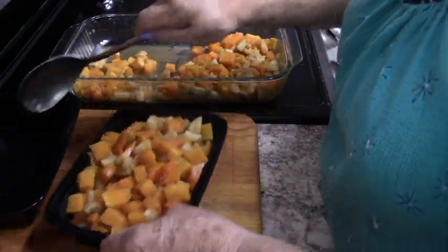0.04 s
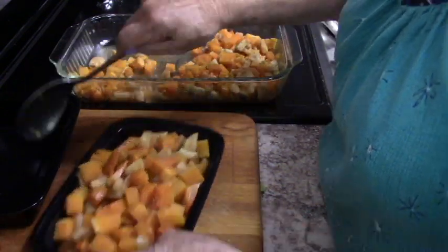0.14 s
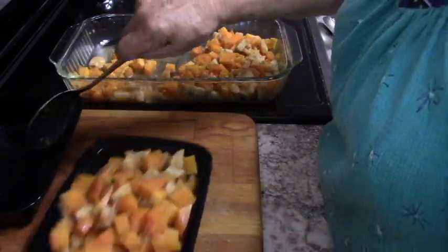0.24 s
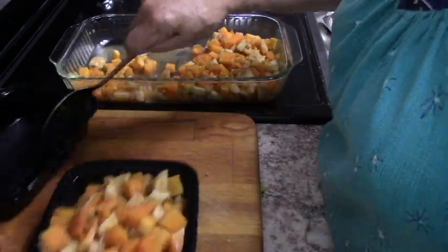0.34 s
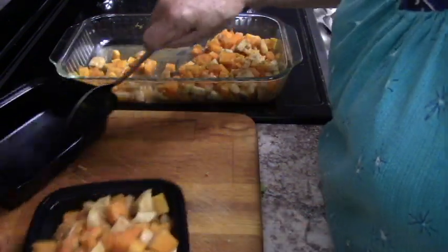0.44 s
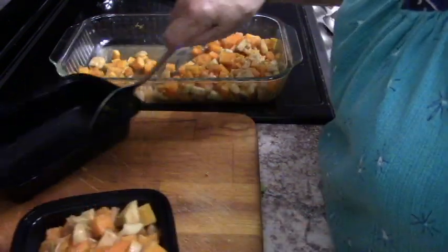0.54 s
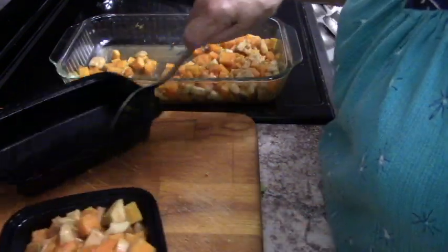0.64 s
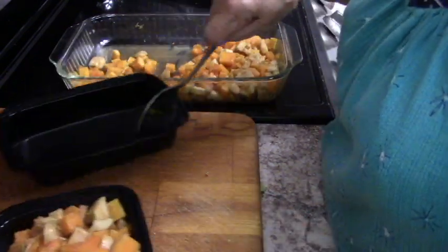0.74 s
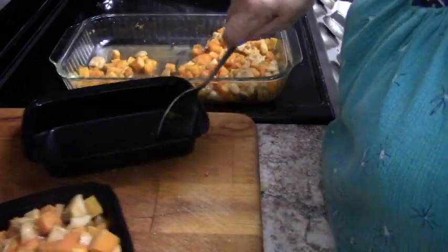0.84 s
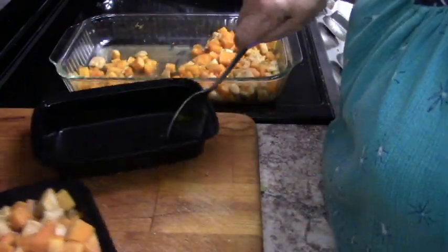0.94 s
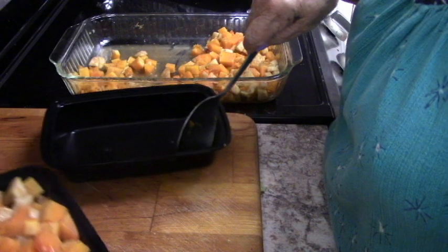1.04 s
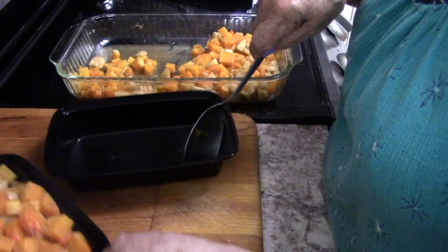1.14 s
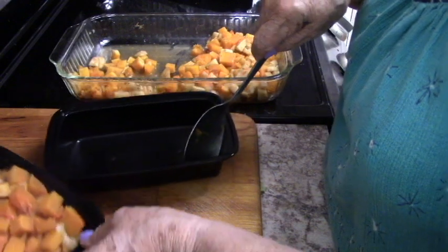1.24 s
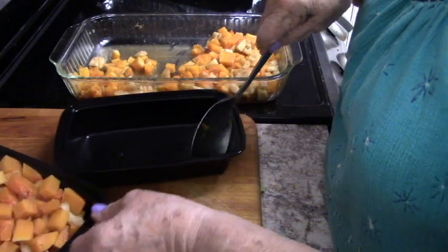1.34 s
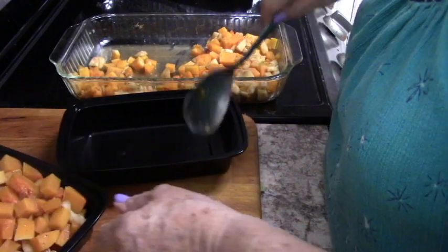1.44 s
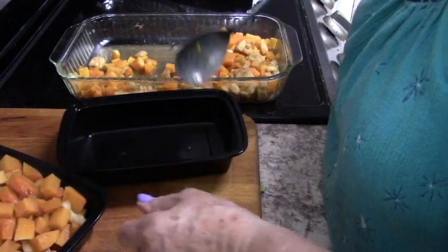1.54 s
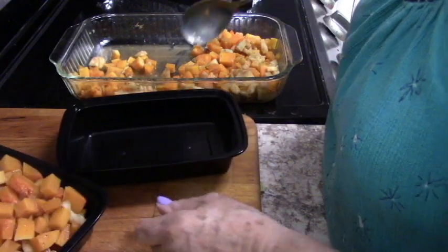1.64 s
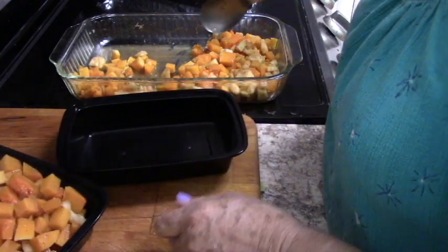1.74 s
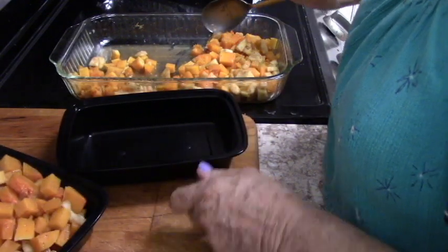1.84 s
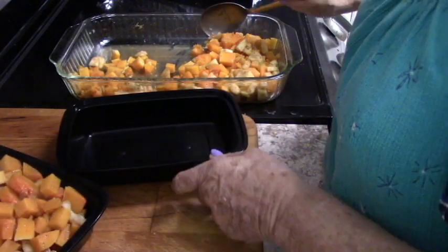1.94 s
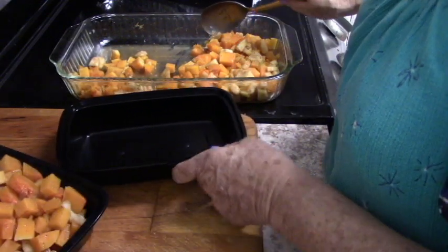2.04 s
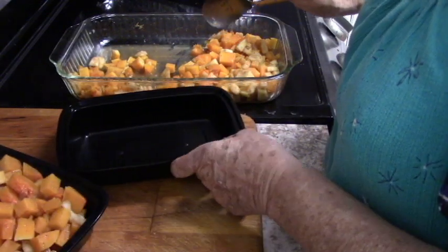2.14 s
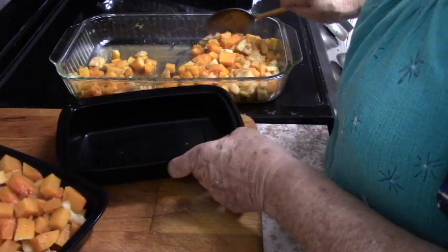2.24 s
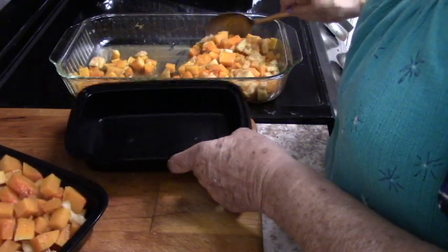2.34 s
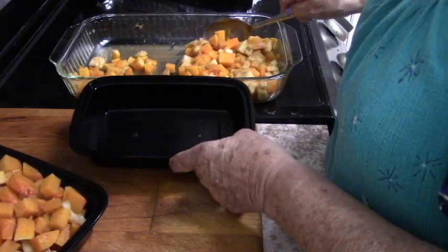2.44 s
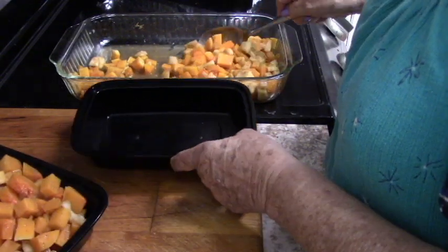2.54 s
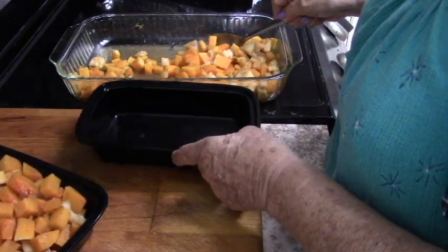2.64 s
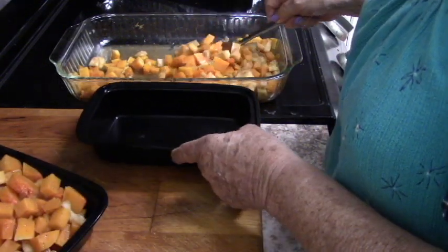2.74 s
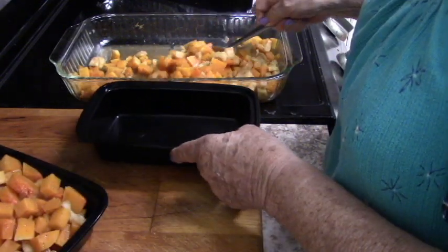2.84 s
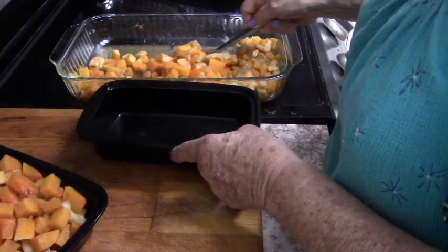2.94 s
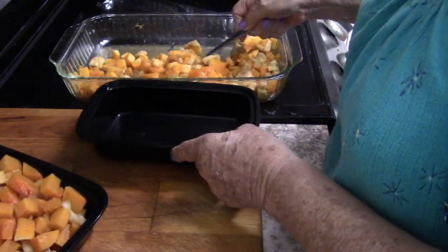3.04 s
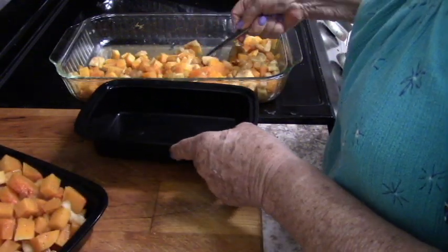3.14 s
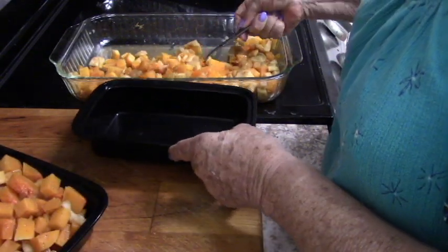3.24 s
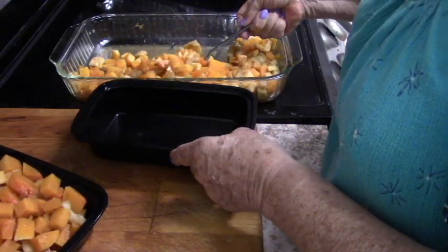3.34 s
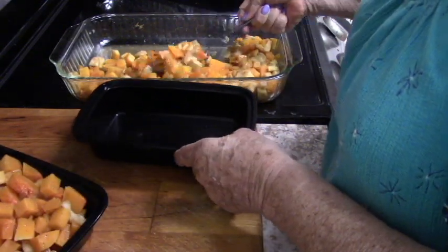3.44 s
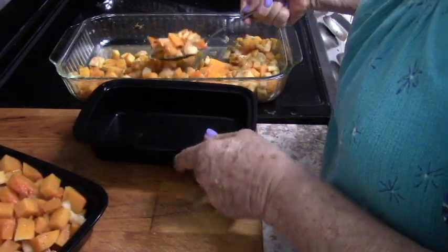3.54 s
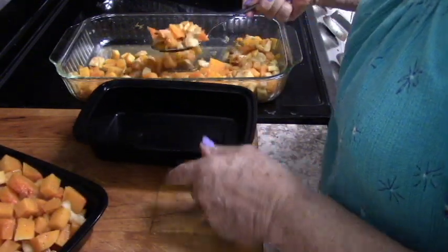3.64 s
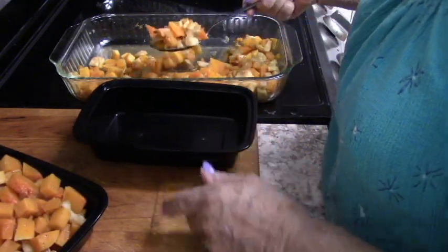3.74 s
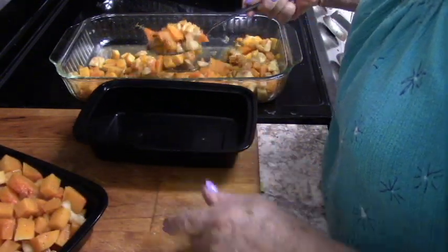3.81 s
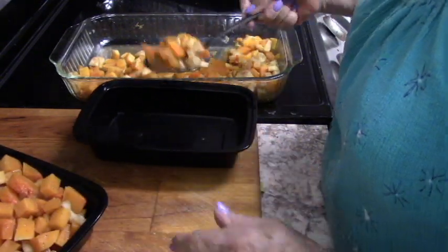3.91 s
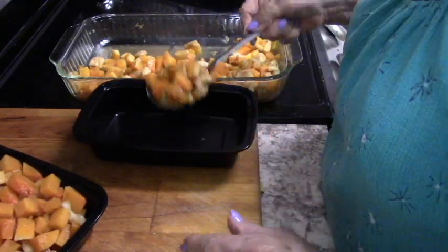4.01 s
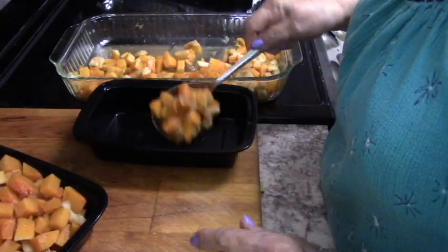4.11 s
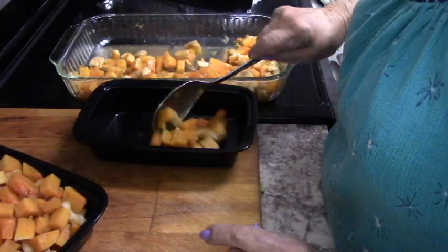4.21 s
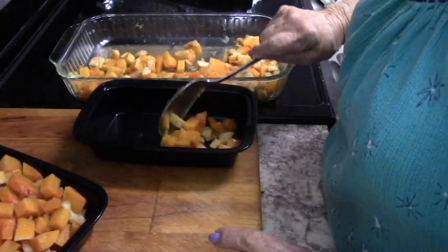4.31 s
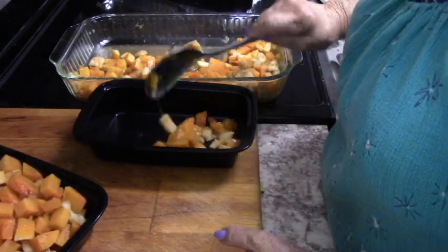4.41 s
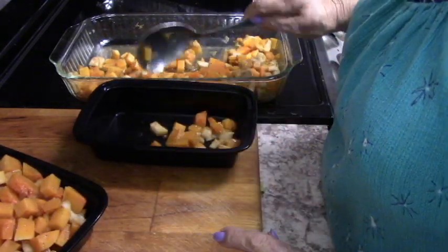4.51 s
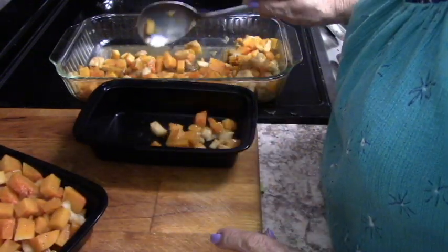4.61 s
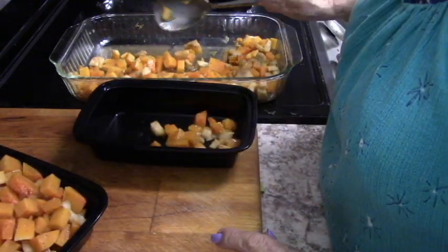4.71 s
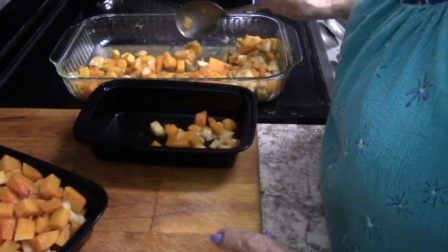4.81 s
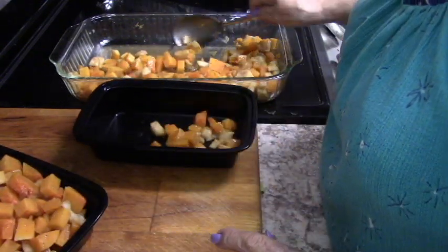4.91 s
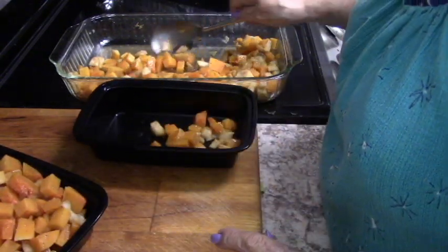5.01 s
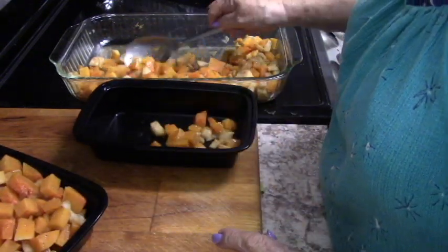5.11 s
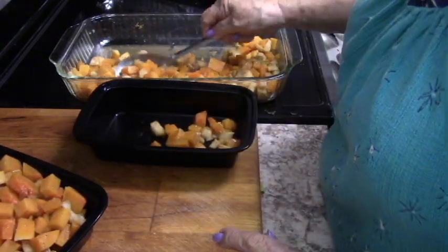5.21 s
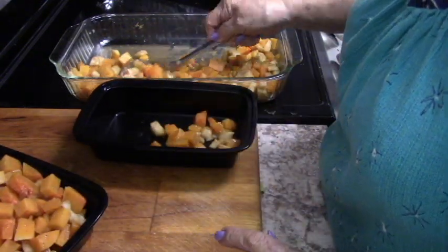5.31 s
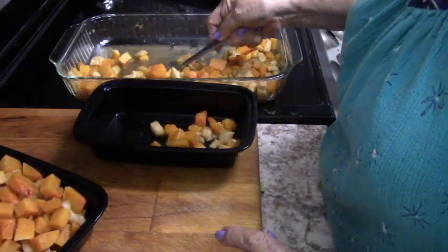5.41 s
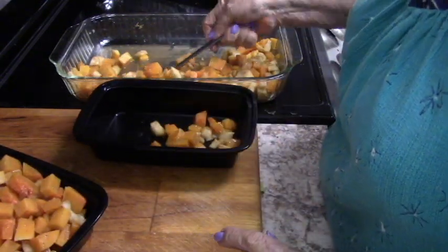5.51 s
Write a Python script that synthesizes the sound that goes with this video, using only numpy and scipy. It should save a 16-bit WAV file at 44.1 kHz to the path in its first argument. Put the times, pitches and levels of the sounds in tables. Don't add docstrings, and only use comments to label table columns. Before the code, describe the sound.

A close, slightly left-leaning stereo view of a small quiet kitchen with soft air hiss and short hard-walled reflections. Faint rubbing begins, then at 0.2-0.3 s a loud cluster of hard plastic knocks. From about 0.36 to 0.65 s an empty tray is pulled over a wooden board with a rough, hollow, slightly squeaky scrape; a longer juddering pull runs from 0.75 to 1.45 s, with a sharp click near 1.19. Near silence follows, with only a faint hand brush. At 2.2 s the spoon touches glass lightly, then taps brightly at 2.29. From 2.45 to 3.7 s it digs through soft cubes with small muffled knocks and tiny wet ticks. Cubes fall into the tray in faint dull pats around 4.2-4.5 s. A strong, quickly damped glass clink with a rebound comes at 4.94, quiet digging from 5.1, and a duller clink at 5.4.

```python
import sys
import numpy as np
from scipy import signal
from scipy.io import wavfile

SR = 44100
rng = np.random.default_rng(int(sys.argv[2]) if len(sys.argv) > 2 else 0)


def unload_audio(sound):
    columns = np.transpose(np.atleast_2d(sound))
    steps = np.round(np.clip(columns, -1, 1) * 32767)
    wavfile.write(sys.argv[1], SR, steps.astype(np.int16))


def invert_db(x):
    u = np.asarray(x, float) / 20
    return 10 ** u


N = 245195

# start_s, load_db, speed_db
DRAG_PULLS = [
    [(0.0, -58, -49.5), (0.212, -58.5, -48), (0.29, -56, -48.5)],
    [(0.36, -52, -45), (0.42, -37.5, -43.5), (0.49, -45, -43), (0.56, -46.5, -48.5), (0.636, -48.5, -44.5),
     (0.67, -46, -48.5)],
    [(0.75, -39.5, -41.5), (0.835, -42, -38.5), (0.93, -47.5, -51), (1.069, -48.5, -46), (1.18, -50, -49),
     (1.25, -53, -49.5), (1.415, -46.5, -48.5), (1.441, -66, -64), (1.47, -80, -81)],
]
# start_s, length_s, load_db, speed_db
SWIPES = [
    (1.755, 0.7, -68, -82),
    (2.059, 0.098, -61.5, -59.5),
    (2.432, 0.49, -61, -72.5),
    (2.847, 0.45, -72.5, -74.5),
    (3.745, 0.33, -68.5, -65),
    (4.04, 0.25, -68.5, -78),
    (4.188, 0.29, -67, -80),
    (5.07, 0.24, -65.5, -64.5),
]
SWIPE_ATTACK, SWIPE_RELEASE, SWIPE_EDGE_DB = 0.28, 0.47, -12.5
RANGE_LOAD_SHARE = [0.89, 0.25, 0.18, 0.022]
RANGE_LEVEL_DB = [0.17, 5.56, 4.26, 0.5]
# pitch_hz, density_db per Hz
RUB_COLOUR = [(47, -60.5), (80, -38.5), (361, -8.5), (404, -12), (515, -7), (751, -6), (1530, -2),
              (4330, -2), (8600, -8.5), (14300, -23.5), (16000, -46)]
# pitch_hz, likeness
RUB_ALIKE = [(60, 0.63), (240, 1), (950, 0.97), (3770, 0.9), (15000, 0.44)]
# pitch_hz, width_hz, level_db
TRAY_RESONANCES = [(495, 27, -6), (1500, 370, 0), (2900, 310, -2), (3680, 40, -7), (5180, 690, -7),
                   (5910, 116.5, -7), (8470, 18, -9)]
# time_s, hollow_hz, hollow_db, edge_hz
TRAY_TILT = [(0, 2124, 5.5, 6040), (.3, 1917, 7.5, 6100), (.5, 1713, 2.5, 9100), (0.648, 2460, -4, 8200),
             (.76, 2300, -2.5, 7600), (.86, 2300, -5.5, 5900), (.96, 1650, 8, 6360),
             (1.12, 1687, 8.5, 6900), (1.451, 2406, 3.5, 6200)]
# start_s, length_s, level_db, pitch_hz, width_hz
SQUEALS = [(0.469, 0.036, -51, 2900, 120), (.51, .11, -47, 9100, 350), (.58, .1, -47, 8700, 350),
           (.65, .15, -46, 8250, 350), (.615, .04, -46, 1050, 80), (5.095, .02, -51, 7800, 150),
           (1.08, .06, -44, 900, 200), (.75, 0.033, -45, 6030, 300), (.29, 0.06, -48, 2620, 300),
           (.42, 0.069, -43, 1880, 200), (.53, .04, -48, 3530, 300), (1.2, 0.096, -46, 2100, 150),
           (1.3, 0.042, -44.5, 875, 120), (2.11, .04, -54, 1400, 300), (2.125, 0.023, -56, 810, 150),
           (0.741, 0.1, -42, 3050, 90), (0.799, 0.05, -40, 5270, 900), (0.958, 0.095, -47, 1920, 120),
           (1.041, 0.059, -41, 1820, 100), (1.06, 0.055, -46, 2740, 70), (1.322, 0.08, -43.5, 3380, 500),
           (1.892, 0.17, -66.5, 2020, 50), (1.93, 0.13, -67.5, 1650, 40), (2.116, .025, -56.5, 3100, 303),
           (2.362, 0.028, -52, 734, 90), (2.395, 0.029, -56.5, 1710, 70), (3.797, 0.25, -67, 7360, 1200)]

# start_s, peak_db, hardness_db, ring_hz
TRAY_KNOCKS = [(0.2276, -13, -2, 900), (0.2339, -4, -3, 1034), (0.2421, -21.5, 12.5, 1640),
               (0.258, -12, -10, 1510), (0.2812, -22, -8, 2400), (0.3742, -20.5, -10, 3530),
               (0.4005, -21, -13, 2350), (0.6684, -32, -20, 2800), (0.6769, -20, -31, 2840),
               (0.7516, -24, 1, 1500), (1.1898, -19, 3, 7800), (1.1915, -18.5, 9.5, 3920),
               (.5377, -27, -5, 1390), (.408, -28, -8, 1500)]
# start_s, peak_db, hardness_db, ring_hz, length_share
DIGS = [(2.4839, -40, -3.5, 2710, 0.5), (2.5485, -44.5, -2, 1310, 0.62), (2.582, -48, -16, 3180, 0.74),
        (2.6476, -53, -9, 930, 0.78), (2.6838, -40, 0, 837, 1), (2.7268, -26, -0.5, 1070, 0.29),
        (2.7545, -35, -9, 1170, 0.35), (2.847, -50, -5, 2930, 0.31), (2.9375, -42, -19, 1990, .5),
        (2.9415, -41, -18, 3020, .4), (3.032, -48, -18, 670, 0.6), (3.153, -61.5, 6, 360, 1),
        (3.189, -52, -2, 856, .9), (3.4524, -45.5, -3.5, 842, .9), (3.711, -55.5, 9, 5160, .9)]
# start_s, peak_db, hardness_db, ring_hz, length_share
CUBE_DROPS = [(4.0301, -58, -8, 503, 1.7), (4.2075, -49, -13.5, 775, 1.26), (4.2164, -51, -8, 1500, .9),
              (4.234, -48, 15, 860, .9), (4.2935, -47, -9, 1440, 1), (4.2995, -52.5, -11, 604, 0.78),
              (4.3075, -50, -10, 1450, 1.3), (4.3241, -58, -2, 980, 1.1), (4.336, -55.5, -9, 700, 1.4),
              (4.3538, -53.5, -8, 495, 1.1), (4.363, -58, -7, 523, 1.1), (4.4022, -62, -17, 410, 1.4),
              (4.4835, -51, -5.5, 1500, .8), (4.4985, -54, -15, 840, 0.75), (4.5196, -48.5, -4, 820, 1.1),
              (5.1134, -53, -4, 946, 1)]
# start_s, peak_db, hardness_db, ring_hz
SECOND_DIGS = [
    (5.0984, -42.5, 6.5, 7400),
    (5.2275, -43, -14, 2140),
    (5.2588, -42, -22, 2720),
    (5.3724, -56.5, -10, 2960),
]
# start_s, peak_db, hardness_db, ring_hz
BOUNCES = [
    (0.32, -49, -2, 1820),
    (.263, -30, -9, 1500),
    (.270, -27, -21, 900),
    (2.733, -40, -10, 1500),
    (2.945, -42.5, -5, 1580),
    (4.312, -55.5, -7.5, 1120),
    (4.505, -61, -1, 1424),
]
# lows_db, lows_per_hardness, lows_db per octave of ring, highs_db,
# highs_per_hardness, t60_s, pure_ring, lowest_hz, thud_db
HARD_TRAY = (-10, -0.14, 0.5, -0.5, 1.0, 0.0249, 0.38, 368, -27)
WET_FOOD = (-10, 0.5, -3, -4, 1.0, 0.06, 0.35, 380, -24)
SOFT_CUBE = (-1, -1.0, 0.0, -20, -.1, .021, .2, 330, -9)
REBOUND = (-4.5, -0.5, 0.5, 6, 1, 0.04, 0.6, 383, -19)
# start_s, peak_db, centre_hz
SMACKS = [(0.24, -14, 8600), (.257, -18, 8850), (1.1905, -17, 7900), (1.592, -57, 11000),
          (1.607, -51.5, 5170), (2.792, -48, 12600), (3.082, -57, 8800), (3.155, -41.5, 9070),
          (3.365, -61, 10760), (3.466, -47, 10700), (3.603, -52.5, 6340), (3.709, -60, 11930),
          (4.031, -53, 11100), (4.264, -39.5, 10240), (4.337, -52, 10000), (4.352, -53, 8050),
          (4.522, -45.5, 9400), (5.098, -37, 11100), (5.124, -57, 11000), (5.14, -43, 9900),
          (5.184, -47, 10200), (5.209, -50, 12170), (5.229, -49, 10700), (5.096, -44, 13500),
          (5.278, -53, 11000), (4.523, -50, 5140), (4.484, -53, 2900), (2.728, -31.5, 3220),
          (2.7284, -37, 4670), (5.372, -51, 3800), (.4008, -24, 2380), (5.26, -41.5, 4500),
          (5.275, -50, 7940)]

# start_s, peak_db, crack_db under the peak, damping_share, contact_cut_hz
CLINKS = [
    (2.2038, -28, -13, 0.56, 4500),
    (2.2855, -7.5, -13.5, 0.48, 13200),
    (4.9351, -6, -8, 1, 5900),
    (5.4044, -12.5, -13.5, 0.62, 6460),
    (2.321, -28.5, -14, 0.53, 8000),
    (4.9418, -12.5, -9, 0.31, 12000),
]
# glass_db, steel_db, bass_lift_db, top_slope_db per octave, crowd_db,
# crowd_length_share, tick_db, wash_db
CLINK_DRIVE = [
    (-3, -12.5, 16, -8.5, -28.5, 0.99, -22.5, -22.5),
    (-23.5, -6.5, 6, 0.5, -28, .8, -3.5, -22),
    (-7, -6.5, 1.5, -1.5, -21, 0.96, -6, -20),
    (-12, -17.5, -16, -5, -33, 0.63, -15, -16),
    (-13, -6, 3.5, -6, -29.5, .6, -13, -25.5),
    (-14.5, -5, -1, -1, -33, .6, -11.5, -28),
]
# pitch_hz, level_db
STRUCK_PLACE = [
    [(700, 20.5), (870, -6), (505, 2), (1885, 8), (2665, 8.5), (3045, 8.5), (3582, -3), (2285, 9),
     (2505, 12), (4570, 8), (1174, 0.5)],
    [(505, 12.5), (3758, -2.5), (2665, 1.5), (4098, 4), (1174, 3), (700, -20), (1885, 14.5), (7220, 5),
     (8050, -11.5), (11170, 4), (5371, 1), (5190, -5.5), (5588, -8), (3582, -0.5), (8875, 2), (6330, 3)],
    [(505, -15), (5371, 4), (5232, 2), (9850, 5), (12100, 4.5), (10300, -5.5), (6330, -17), (7220, -2),
     (7700, 9), (3758, -1), (4098, 3), (2113, 2), (1637, 2), (8875, -27), (4907, 5.5), (9580, -4),
     (8050, 7), (2285, 5), (12400, -0.5)],
    [(505, 19.5), (1495, 5), (3045, 15), (3582, 6), (4098, 6), (1885, -5), (700, 6), (8050, 11), (2505, 8),
     (12400, -13), (6330, 2), (870, -12)],
    [(5300, 7), (3582, 2)],
    [(3758, 5.5), (5232, 8)],
]
CROWD_BEAT_HZ = [260, 200, 330, 480, 260, 260]
MODE_HZ = [505, 700, 870, 1174, 1495, 1637, 1885, 2113, 2285, 2405, 2505, 2665, 3045, 3582, 3758, 4098,
           4570, 4907, 5232, 5371, 5588, 6330, 6725, 7220, 7700, 8050, 8875, 9580, 9850, 10300, 11170,
           12100, 12400, 13600]
MODE_T60 = [0.17, 0.098, 0.036, 0.1, 0.062, 0.091, 0.28, 0.049, 0.084, 0.024, 0.075, 0.15, 0.045, 0.05,
            0.13, 0.057, 0.095, 0.07, 0.074, 0.065, 0.043, .07, 0.08, 0.072, 0.055, 0.045, 0.022, .06, .05,
            .05, 0.03, .04, 0.034, .05]
MODE_DB = [-18, -31, -10, -17.5, -11.5, -8, -16.5, -10, -12.5, -1, -12.5, -12.5, -4.5, -0.5, -3.5, -10, -14,
           -8, -6, -4, -12.5, -9, -24.5, -5, -14.5, -13.5, 0.5, -13.5, -12, -8.5, -4, -8.5, -4.5, -11]
STEEL_HZ = [2665, 3582, 3758, 5232, 5371, 5588, 6330, 7220, 8875, 9580, 10300, 11170, 13600]
# start_s, peak_db, pitch_hz, t60_s
DISH_FLEX = [
    (2.203, -28, 720, .04),
    (2.212, -36, 590, 0.1),
    (2.324, -47, 343, 0.11),
    (4.939, -43, 310, 0.095),
    (5.115, -38.5, 505, 0.087),
    (5.233, -50, 495, 0.085),
    (5.407, -49.5, 330, 0.12),
]

# pitch_hz, t60_s
ROOM_T60 = [(200, 0.48), (1000, 0.36), (4000, 0.33), (8000, 0.29), (13000, 0.3)]
# start_s, peak_db, pitch_hz, t60_s
BOOMS = [
    (.86, -60, 135, .15),
    (.73, -60, 115, .15),
    (1, -54, 185, 0.14),
    (.44, -54, 260, .08),
    (4.935, -57, 150, 0.17),
    (4.3, -56, 260, .15),
    (5.4, -47, 350, 0.11),
    (2.5, -63, 240, 0.29),
    (2.33, -60, 210, .1),
]
# pitch_hz, density_db per Hz
HUSH_COLOUR = [(25, -16.5), (60, -7), (125, -6), (250, -5), (500, 2), (1000, 0.5), (1600, -0.5), (2100, -4),
               (5000, -9), (8000, -15.5), (13000, -24.5), (14500, -32), (16000, -50)]
# pitch_hz, likeness
HUSH_ALIKE = [(60, 0.13), (240, -0.18), (950, -1.1), (3770, 0.2), (15000, -0.032)]
HUSH_DB, WHINE_HZ, WHINE_DB = -62, 5560, -88
ROOM_DB, DISH_ROOM_DB = -12.5, -10.5
BODY_CUT_HZ, AIR_CUT_HZ = 216, 10000
LEFT_LEAD = .15
COUNTER_ECHO_DB = -10
CENTRES_HZ = 25 * 2 ** np.arange(0, 9.4, 1 / 3)


def rms_one(x):
    return x / np.sqrt(np.mean(x ** 2) + 1e-20)


def at_hz(points, hz):
    table_hz, values = np.array(points)[:, 0], np.array(points)[:, 1]
    return np.interp(np.log(hz), np.log(table_hz), values)


def decay(t, t60):
    return invert_db(-60 * t / t60)


def add(track, sound, s):
    i = round(s * SR)
    track[i:i + len(sound)] += sound[:N - i]


def band_pass(x, low_hz, high_hz, order=2):
    return signal.sosfilt(signal.butter(order, [low_hz, high_hz], "band", fs=SR, output="sos"), x)


def drift(rate):
    r = np.exp(-80 * np.pi * rate / SR)
    slow = signal.lfilter([1], [1, -2 * r, r * r], rng.standard_normal(N // 40 + 2002))[2000:]
    return np.interp(np.arange(N) / 40, np.arange(len(slow)), rms_one(slow))


def third_octaves(source, alike):
    for k, hz in enumerate(CENTRES_HZ):
        mid, side = band_pass(source[k % 2], hz / 2 ** (1 / 6), hz * 2 ** (1 / 6))
        likeness = np.clip(at_hz(alike, hz), 0, 1)
        yield hz, np.sqrt(1 + likeness) * mid + np.sqrt(1 - likeness) * side * [[1], [-1]]


def rubbing_gains():
    strokes = [np.transpose(np.concatenate(DRAG_PULLS))]
    shape_db = SWIPE_EDGE_DB * np.array([1, 0, 0, 1])
    for s, length, load_db, speed_db in SWIPES:
        times = s + length * np.array([0, SWIPE_ATTACK, 1 - SWIPE_RELEASE, 1])
        strokes.append([times, load_db + shape_db, speed_db + shape_db])
    gains, share = 0, np.clip(RANGE_LOAD_SHARE, 0, 1)[:, None]
    for s, *controls in strokes:
        before_db = [db[0] if s[0] < .01 else -200 for db in controls]
        load, speed = [np.interp(np.arange(N) / SR, s, db, start, -200)
                       for db, start in zip(controls, before_db)]
        gains = gains + invert_db(share * load + (1 - share) * speed + np.array(RANGE_LEVEL_DB)[:, None])
    return gains


def friction(grains_per_s, size_db, patchy_db, judder_db):
    sizes = invert_db(size_db * np.minimum(rng.exponential(1, (2, 2, N)), 5))
    sizes = sizes * rng.choice([-1, 1], (2, 2, N))
    grains = sizes * (rng.random((2, 2, N)) < grains_per_s / SR)
    shaken = grains.copy()
    for hz, width, db in TRAY_RESONANCES:
        r = np.exp(-np.pi * width / SR)
        peak = signal.lfilter([1, 0, -1], [1, -2 * r * np.cos(2 * np.pi * hz / SR), r * r], grains)
        shaken += (1 - r * r) / 2 * peak * 0.66
    steps = np.arange(0, N, 16) / SR
    s, *columns = np.transpose(TRAY_TILT)
    hollow_hz, hollow_db, edge_hz = [np.interp(steps, s, column) for column in columns]
    hollow_db = hollow_db * (steps < s[-1])
    ranges, judder = np.zeros((4, 2, N)), drift(30.)[::16]
    for hz, band in third_octaves(shaken, RUB_ALIKE):
        lift_db = hollow_db * np.exp(-(np.log(hollow_hz / hz) / 0.51) ** 2)
        lift_db = lift_db + 4.04 * np.exp(-(np.log(edge_hz / hz) / .18) ** 2)
        patches_db = judder_db * judder + patchy_db * drift(16.0)[::16]
        gain = invert_db(at_hz(RUB_COLOUR, hz) + lift_db + patches_db).repeat(16)[:N]
        ranges[np.searchsorted([1400, 3500, 8000], hz)] += gain * np.sqrt(hz) * rms_one(band)
    return sum(gain * rms_one(part) for gain, part in zip(rubbing_gains(), ranges))


def squeals():
    out = np.zeros(N)
    for (s, length, db, hz, width), noise in zip(SQUEALS, rng.standard_normal((len(SQUEALS), SR // 3))):
        tone = rms_one(band_pass(noise, hz - width / 2, hz + width / 2, order=1))
        tone = tone[SR // 20:][:round(length * SR)]
        add(out, invert_db(db) * tone * np.hanning(len(tone)), s)
    return out


def knocks():
    kinds = [(TRAY_KNOCKS, HARD_TRAY), (DIGS, WET_FOOD), (CUBE_DROPS, SOFT_CUBE), (SECOND_DIGS, WET_FOOD),
             (BOUNCES, REBOUND)]
    rows = [(row, kind) for table, kind in kinds for row in table]
    out, t = np.zeros(N), np.arange(SR // 8) / SR
    for (row, kind), burst in zip(rows, rng.standard_normal((len(rows), len(t)))):
        s, mid_db, hard_db, ring_hz, *length = row
        lows_db, lows_hard, lows_ring, highs_db, highs_hard, t60, ring, lowest_hz, thud_db = kind
        t60 = t60 * np.prod(length)
        low_db = mid_db + lows_db + lows_hard * hard_db + lows_ring * np.log2(ring_hz / 1500)
        high_db = mid_db + highs_db + highs_hard * hard_db
        struck = burst + 2.2 * band_pass(burst, ring_hz * .9, ring_hz * 1.1, order=1)
        struck = struck + ring * np.sin(2 * np.pi * ring_hz * t) * decay(t, 3 * t60)
        ranges = [(240, 420, low_db + thud_db, 3.0), (lowest_hz, 1630, low_db + 4, 2.5),
                  (1200, 4000, mid_db, 1.15), (4130, 7600, high_db + 0.5, 0.23)]
        for low, high, db, share in ranges:
            onset = 1 - decay(t, 1 / low)
            part = band_pass(struck * decay(t, t60 * share) * onset, low, high)
            add(out, invert_db(db) * part / np.abs(part).max(), s)
    return out


def smacks():
    out, t = np.zeros(N), np.arange(SR // 30) / SR
    for (s, db, hz), burst in zip(SMACKS, rng.standard_normal((len(SMACKS), len(t)))):
        tick = band_pass(burst * decay(t, 0.018), hz * 0.81, min(hz * 1.16, 15500))
        add(out, invert_db(db) * tick / np.abs(tick).max(), s)
    return out


def mode_levels(hz, drive, place):
    glass_db, steel_db, bass_db, slope_db = drive[:4]
    level_db = np.array(MODE_DB) + np.where(np.isin(hz, STEEL_HZ), steel_db, glass_db)
    level_db += bass_db * (hz < 1300) + slope_db * np.log2(np.maximum(hz / 3000, 1))
    return level_db + sum(db * (np.abs(np.log(hz / near)) < .015) for near, db in place)


def clinks():
    out, t = np.zeros(N), np.arange(SR // 3) / SR
    hz, t60 = np.array(MODE_HZ)[:, None], np.array(MODE_T60)[:, None]
    for clink, drive, place, beat_hz in zip(CLINKS, CLINK_DRIVE, STRUCK_PLACE, CROWD_BEAT_HZ):
        s, db, crack_db, damping, cut_hz = clink
        crowd_db, crowd_share, tick_db, wash_db = drive[4:]
        lag, split = rng.random((2, len(hz), 1))
        late = np.clip(t - .0007 * lag, 0, 1)
        pair = np.sin(2 * np.pi * hz * late)
        pair = pair + 0.2 * np.sin(2 * np.pi * hz * (1 + 0.014 * (split - .5)) * late)
        r = np.exp(-2 * np.pi * beat_hz / SR)
        beats = signal.lfilter([1], [1, -2 * r, r * r], rng.standard_normal((2, len(hz), len(t))))
        crowd = rms_one(beats[0] * np.sin(2 * np.pi * hz * t) + beats[1] * np.cos(2 * np.pi * hz * t))
        rings = pair * decay(late, t60 * damping)
        rings = rings + invert_db(crowd_db) * crowd * decay(t, crowd_share * (0.035 + 6.3 * t60))
        crack_fade = decay(t, 0.049) + invert_db(wash_db) * decay(t, 0.39)
        crack = band_pass(rng.standard_normal(len(t)) * crack_fade, 440, cut_hz)
        mode_gains = invert_db(db - 4.5 + mode_levels(hz[:, 0], drive, place))
        add(out, mode_gains @ rings + invert_db(db + crack_db) * crack, s)
        tick = band_pass(rng.standard_normal(len(t)) * decay(t, .018), max(cut_hz, 7500), 17500)
        add(out, invert_db(db + crack_db + tick_db) * tick, s)
    return band_pass(out, 470, 18000, order=3)


def flex():
    out, t = np.zeros(N), np.arange(SR // 3) / SR
    for s, db, hz, t60 in DISH_FLEX:
        swell = 1 - decay(t, 0.057)
        add(out, invert_db(db) * np.sin(2 * np.pi * hz * t) * swell * decay(t, t60), s)
    return out


def kitchen(x):
    t, tail = np.arange(SR // 2) / SR, 0
    source = rng.standard_normal((2, 2, len(t)))
    for hz, band in third_octaves(source, [(150, 1.0), (1000, 0.98), (6000, 0.048)]):
        tail = tail + band * decay(t, at_hz(ROOM_T60, hz))
    tail = tail * np.clip((t - .003) / .012, 0, 1)
    tail = tail / np.sqrt(np.sum(tail ** 2) / 2)
    return signal.fftconvolve(x[None], tail, axes=1)[:, :N]


def booms():
    out, t = np.zeros(N), np.arange(SR // 3) / SR
    for (s, db, hz, t60), noise in zip(BOOMS, rng.standard_normal((len(BOOMS), len(t)))):
        lump = band_pass(noise * decay(t, t60), hz * .75, hz * 1.3, order=3)
        add(out, invert_db(db) * lump / np.abs(lump).max(), s)
    return out


def hush():
    bands = third_octaves(rng.standard_normal((2, 2, N)), HUSH_ALIKE)
    air = rms_one(sum(invert_db(at_hz(HUSH_COLOUR, hz)) * band for hz, band in bands))
    whine = rms_one(band_pass(rng.standard_normal(N), WHINE_HZ - 60, WHINE_HZ + 60))
    return invert_db(HUSH_DB) * air + whine * invert_db(WHINE_DB + 4.5 * drift(4.))


def scene():
    tray = knocks() + smacks() + squeals()
    dish = clinks() + flex()
    rubbing = friction(6000., 2.7, patchy_db=1.72, judder_db=1.3)
    tray_and_rub = tray + rubbing.mean(axis=0)
    walls = kitchen(invert_db(ROOM_DB) * tray_and_rub + invert_db(DISH_ROOM_DB) * dish)
    near = band_pass(tray + dish + rubbing + walls, BODY_CUT_HZ, AIR_CUT_HZ)
    side = band_pass((near[0] + near[1]) / 2, 350, 4500, order=1) * .15
    lead = LEFT_LEAD * np.gradient(band_pass(tray_and_rub, BODY_CUT_HZ, AIR_CUT_HZ))
    echo = invert_db(COUNTER_ECHO_DB) * band_pass(np.roll(dish + tray, 23), 5000, 14000, order=1)
    return near + (side + lead + echo) * [[1], [-1]] + hush() + booms()


def band_limit(x):
    return signal.sosfilt(signal.butter(12, 16850, fs=SR, output="sos"), x)


def record(dry):
    top_cut = signal.cheby2(10, 60, 17100, fs=SR, output="sos")
    return band_limit(signal.sosfilt(top_cut, dry))


dry = scene()
out = record(dry)
unload_audio(out)
```